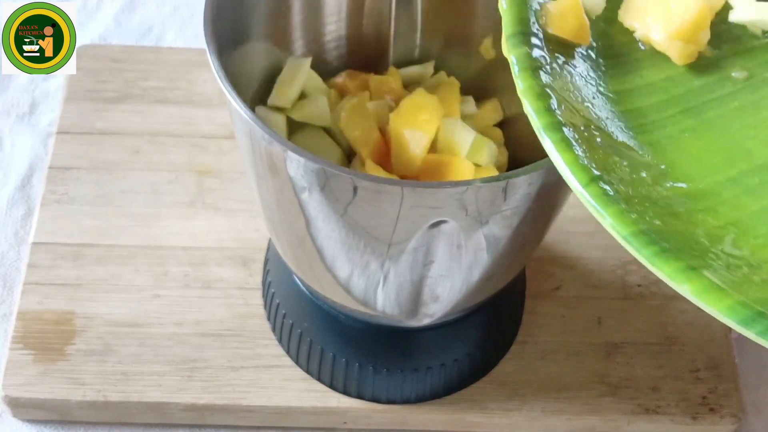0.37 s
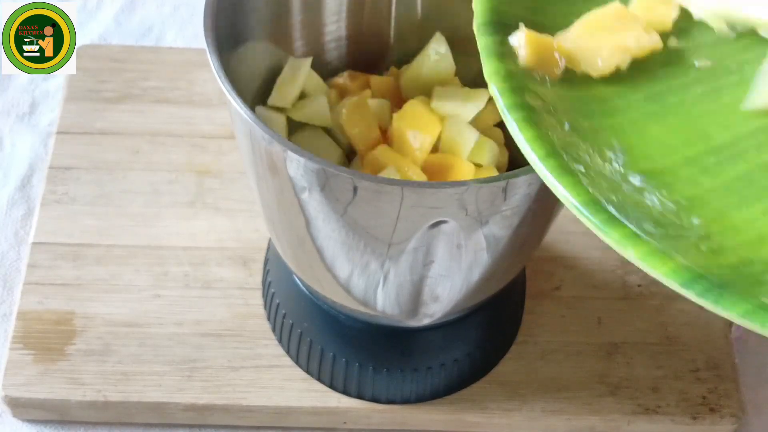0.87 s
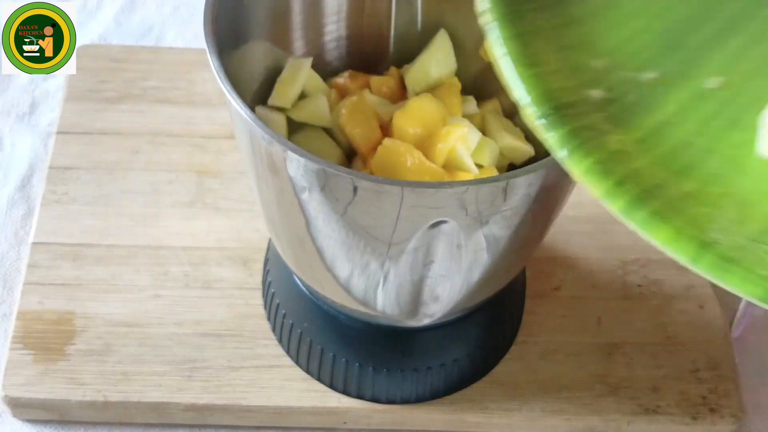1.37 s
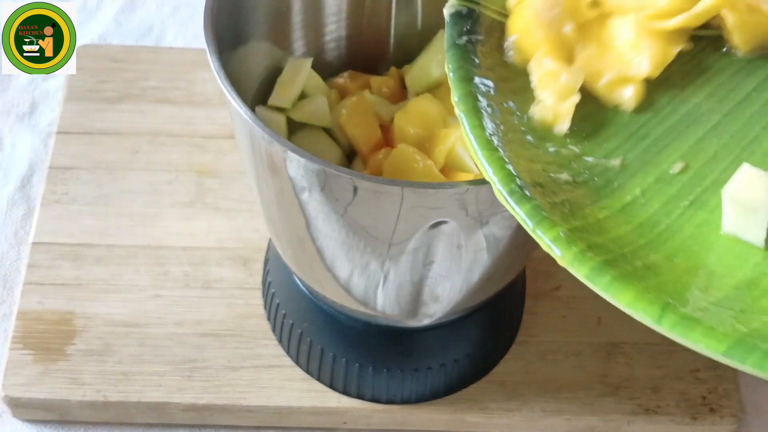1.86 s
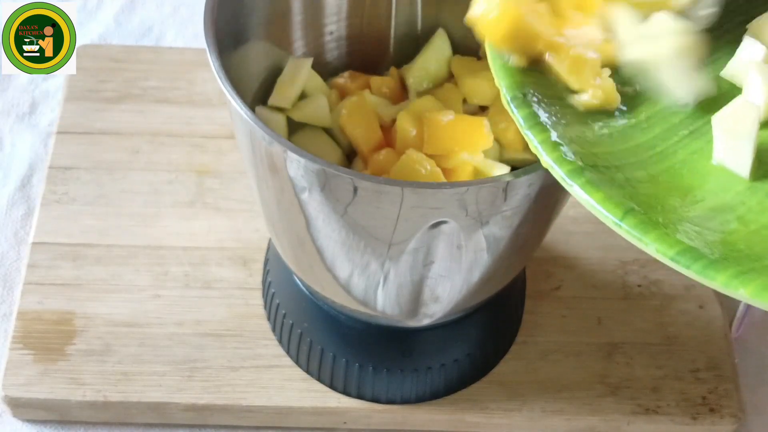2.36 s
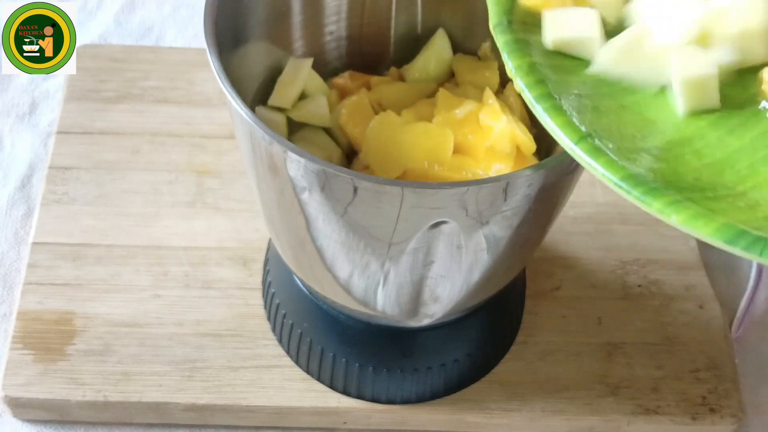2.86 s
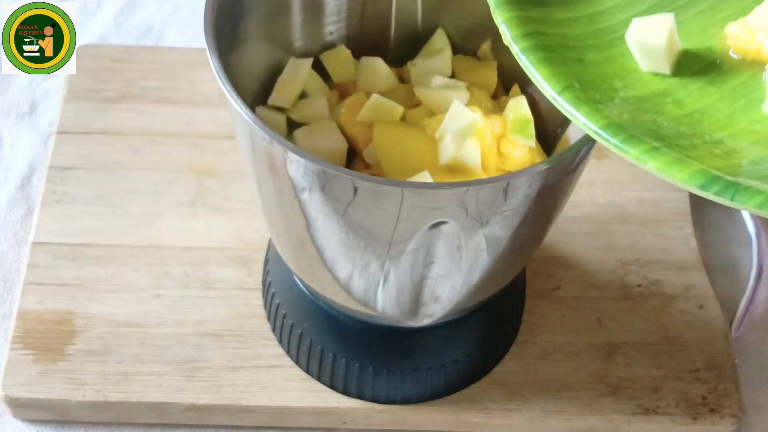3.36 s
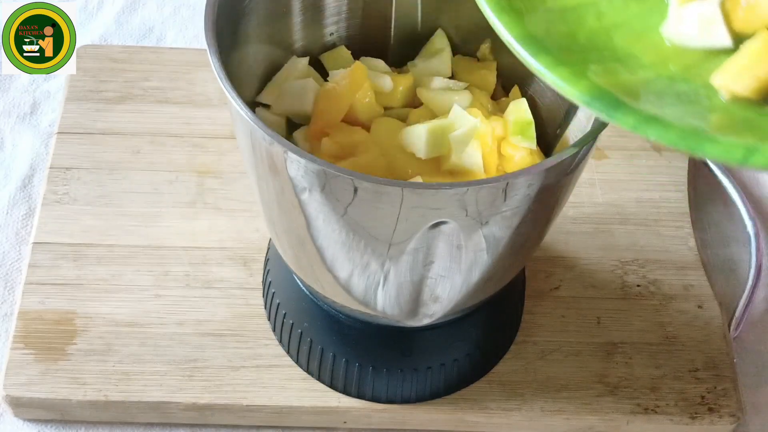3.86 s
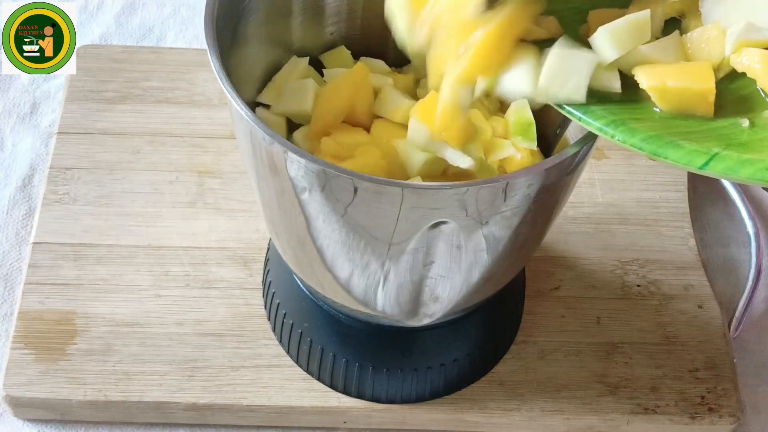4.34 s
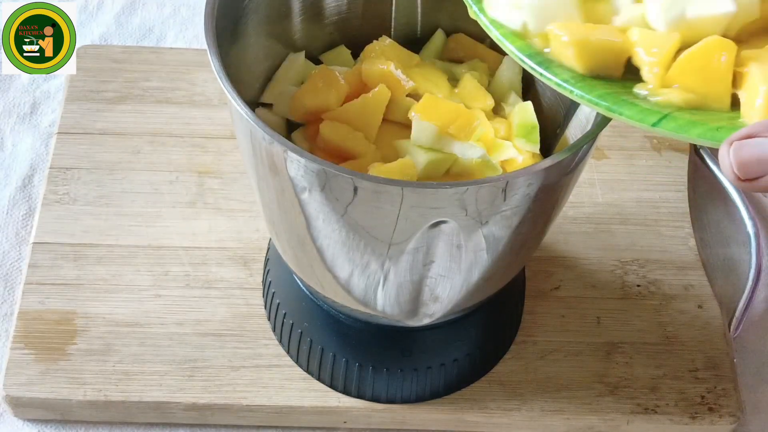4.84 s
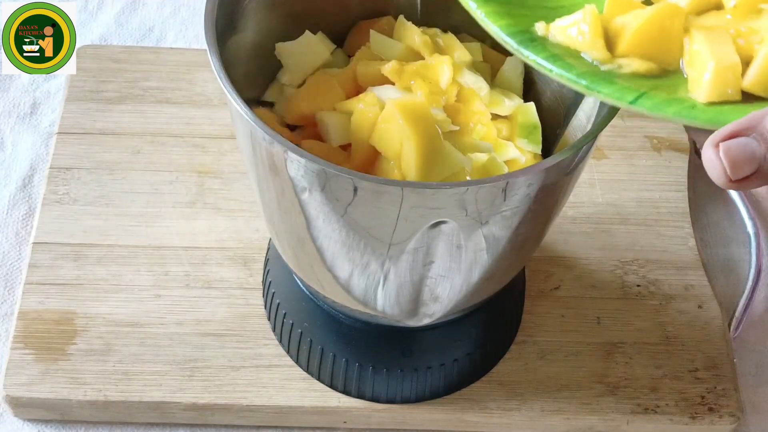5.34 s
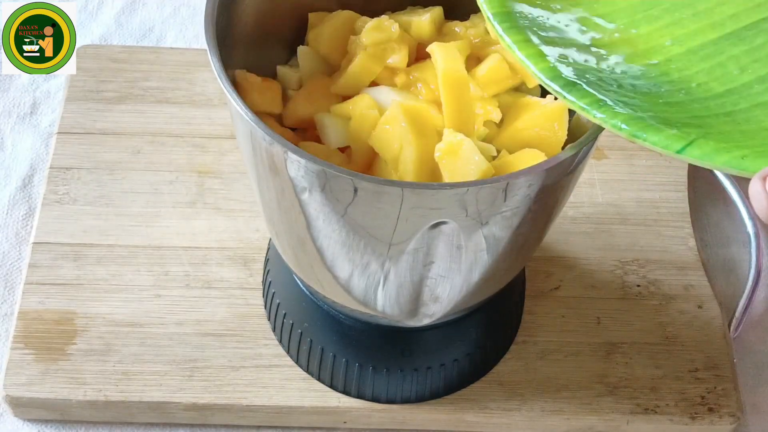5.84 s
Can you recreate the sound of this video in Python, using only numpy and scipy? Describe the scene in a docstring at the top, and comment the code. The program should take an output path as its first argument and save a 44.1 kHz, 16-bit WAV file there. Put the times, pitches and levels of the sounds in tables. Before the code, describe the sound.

Close to a phone in a small quiet kitchen, a steel spoon taps and scrapes chopped fruit off a hard plastic plate. Dry, sharp clacks come irregularly, each followed by a brief gritty slide, with soft hollow plops as pieces land in a steel jar. A short lull comes after the first second, then the work resumes, with the hardest knock past the middle and steady clacks to the end.

```python
"""A faint slide, then sharp taps: a steel spoon knocks and scrapes chopped fruit off a hard plastic plate. Each
tap excites decaying modes of plate and spoon; the sliding edge is gritty noise, partly rung through the same
modes. Fruit plops into a steel jar as decaying pairs of notes, a few with a sharp knock at the start, and some
taps carry a like low thump. A small kitchen echoes the blows, over a dull rumble of hands on plate and board
and a faint murmur of air, close to a phone."""
import sys
import numpy as np
from scipy import signal
from scipy.fft import rfft, irfft
from scipy.io import wavfile
from scipy.ndimage import uniform_filter1d

SR = 44100
rng = np.random.default_rng(int(sys.argv[2]) if len(sys.argv) > 2 else 0)


def ratio(d):
    """dB to gain"""
    e = np.asarray(d, float) / 20
    return 10 ** e


def log_audio(samples):
    """Write samples as a 16-bit WAV file to the path given in sys.argv[1]."""
    # one column per channel
    frames = np.atleast_2d(samples).T
    # limit to full scale, then quantise
    limited = np.clip(frames, -1, 1)
    pcm = np.round(limited * 32767).astype(np.int16)
    wavfile.write(sys.argv[1], SR, pcm)


N = 273861

# Spoon striking plate, with bounces; the rows at 2.348, 2.536 and 2.927 s give the sharp start of a fruit plop.
# # Each row: start in seconds, body level in dB before damping, # favoured mode in Hz, upper favoured mode in
# Hz, treble level in dB.
TAP_EVENTS = [(0.181, -13.5, 1290, 1580, -14.5), (0.184, -16, 757, 1570, -46),
              (0.199, -36, 860, 1600, -47.5), (0.41, -12, 1210, 1567, -17), (0.56, -11.5, 796, 2250, -35),
              (0.911, 0, 799, 2690, -13.5), (0.923, -25, 910, 1520, -43), (0.94, -10, 750, 1500, -46.5),
              (1.046, -10, 847, 1600, -16.5), (1.626, -31, 711, 1490, -56.5), (1.783, -30, 830, 1590, -48),
              (1.814, -16.5, 717, 1510, -33.5), (1.924, -22.5, 1110, 1540, -48),
              (1.975, -24.5, 710, 1520, -60), (2.209, -38.5, 990, 1590, -66),
              (2.247, -7.5, 650, 2020, -24.5), (2.255, -22, 600, 2330, -37), (2.265, -16.5, 700, 1540, -35),
              (2.348, -29, 604, 1580, -46), (2.481, -27, 702, 1510, -53), (2.536, -18, 700, 1540, -37),
              (2.839, -3, 590, 2760, -20), (2.879, -22, 704, 1630, -52), (2.927, -16, 710, 1520, -50),
              (3.003, -31, 1023, 2540, -42), (3.035, -28, 1120, 1500, -43.5),
              (3.339, -16.5, 1120, 2080, -30), (3.573, -28, 810, 3100, -38.5),
              (3.86, -5.5, 1103, 1957, -15.5), (4.111, -13, 705, 2810, -36.5), (4.602, 5, 870, 1770, -5),
              (4.619, -24, 910, 1740, -49.5), (4.701, -27, 829, 2180, -51), (4.714, -24, 1350, 1590, -58),
              (5.086, -16, 693, 1580, -28.5), (5.336, -7, 1122, 1770, -14.5), (5.351, -12, 813, 1710, -32),
              (5.571, -16.5, 1180, 1740, -49), (5.859, -6.5, 935, 1707, -16), (5.991, -12, 1242, 1500, -32)]
# Modes of the plate. Each row: frequency in Hz, relative level in dB, 60 dB decay time in seconds.
PLATE_MODES = [(301, -15, .06), (424, -10, 0.021), (507, -7, 0.022), (531, -3, 0.037), (716, -3, 0.04),
               (811.4, -2, 0.028), (898.3, -4.5, 0.062), (1120, -4, 0.034), (1228.5, -7.5, 0.054),
               (1512, -4, 0.033), (1600, -4, 0.03), (1707, -6, 0.02), (1999, -0.5, 0.026),
               (2342, -3.5, 0.046), (2537, 0, 0.024), (2760, -4.5, 0.023), (3013, -7, 0.052),
               (3300, -9, 0.023)]
# Modes of the spoon. Each row: frequency in Hz, relative level in dB, 60 dB decay time in seconds.
SPOON_MODES = [(4940, -17.5, 0.033), (5900, -18, 0.041), (7130, -14.5, 0.017), (9760, -7.5, 0.026),
               (10100, -7.5, .015), (10070, -6, 0.072), (10690, -6.5, 0.025), (11460, -6.5, 0.06),
               (13200, -16, .03), (14600, -20.5, .04)]
TOUCH_S = 0.0042  # time in which the edge meets the plate


def level(x):
    """Normalisation of power: scale to rms 1."""
    return x / np.sqrt(np.mean(x ** 2))


def colour(x, points):
    """Spectral shaping: gains in dB at given Hz, interpolated over log frequency."""
    hz, db = np.transpose(points)
    f = np.maximum(np.fft.rfftfreq(len(x), 1 / SR), 1)
    gain = ratio(np.interp(np.log(f), np.log(hz), db))
    return irfft(rfft(x) * gain, len(x))


def band(x, lo_hz, hi_hz):
    """Causal Butterworth band-pass."""
    edges = np.clip([lo_hz, hi_hz], 20, [SR / 2.2, SR / 2.1])
    return signal.sosfilt(signal.butter(2, edges, "bandpass", fs=SR, output="sos"), x)


def walk(rate):
    """Slow random modulation: levels drawn rate times a second, joined by ramps; spread near 1."""
    hold = int(SR / rate)
    steps = np.repeat(rng.standard_normal(N // hold + 1), hold)
    return 1.32 * uniform_filter1d(steps, hold)[:N]


def ring(hz, db, t60, t, phase):
    """Modal superposition: a sum of exponentially decaying sines, peak 1; phase in cycles."""
    swing = np.sin(2 * np.pi * (hz[:, None] * t + phase[:, None]))
    decay = 1000. ** (-t / t60[:, None])
    y = np.sum(ratio(db)[:, None] * swing * decay, axis=0)
    return y / np.abs(y).max()


def add(out, s, x):
    """Linear superposition: mix x in at s seconds."""
    i = int(s * SR)
    out[i:i + len(x)] += x[:N - i]


def taps():
    """Impact excitation: each blow lands elsewhere, so it favours other modes; a short crack starts it."""
    boom_db = -16.5  # low plate modes relative to the body of a tap
    out, t = np.zeros(N), np.arange(SR // 5) / SR
    plate_hz, plate_db, plate_t60 = np.transpose(PLATE_MODES)
    spoon_hz, spoon_db, spoon_t60 = np.transpose(SPOON_MODES)
    count = len(plate_hz)
    low = plate_hz < 640
    # the spoon stays on the plate and damps all but the first swings
    press = 0.18 + 0.74 * np.exp(-(t / 0.004) ** 2)
    onset = np.minimum(t / 0.00043, 1)
    for s, body_db, first_hz, second_hz, treble_db in TAP_EVENTS:
        spot = rng.standard_normal((2, count + len(spoon_hz)))
        favour_db = plate_db + 2 * spot[0, :count]
        favour_db += 15.0 * np.exp(-(np.log(plate_hz / first_hz) / 0.026) ** 2)
        favour_db += 11.0 * np.exp(-(np.log(plate_hz / second_hz) / 0.056) ** 2)
        phase = 0.5 + 0.1 * spot[1, :count]
        body = ring(plate_hz[~low], favour_db[~low], plate_t60[~low], t, phase[~low]) * press
        boom = ring(plate_hz[low], favour_db[low], plate_t60[low], t, phase[low])
        chime = ring(spoon_hz, spoon_db + 8.0 * spot[0, count:], spoon_t60, t, spot[1, count:])
        crack = rng.standard_normal(len(t)) * np.exp(-t / 0.0015)
        tick = band(crack, 6200, 12500) + 0.64 * band(crack, 2500, 16000)
        treble = 0.27 * chime + 1.1 * tick / np.abs(tick).max()
        blow = ratio(body_db) * body + ratio(body_db + boom_db) * boom + ratio(treble_db) * treble
        add(out, s, blow * onset)
    return out


def patchy(x, lo_hz, hi_hz, flicker_db, rate):
    """Independent band modulation: about quarter-octave bands flicker each on their own; rms 1."""
    edges = np.geomspace(lo_hz, hi_hz, int(4 * np.log2(hi_hz / lo_hz)) + 2)
    total = np.zeros(N)
    for k, (lo, hi) in enumerate(zip(edges, edges[1:])):
        total += (-1) ** k * band(x, lo, hi) * ratio(flicker_db * walk(rate))
    return level(total)


def slide(start, length, first_db, last_db, treble_db, modes, low, mid, upper, treble):
    """Sliding friction: touch, steady change of pressure, lift; it sets off from the spot of the last tap."""
    lift_db_per_s = -700
    rim_hz, to_rim_s = 1500, 0.14  # the favoured ring moves from the tap's to the rim's
    t = np.arange(len(mid)) / SR - TOUCH_S
    db = first_db + (last_db - first_db) * np.clip(t / length, 0, 1)
    treble_db = treble_db + 0.09 * (db - first_db)  # a fading slide also dulls
    touch = np.clip(1 + t / TOUCH_S, 0, 1)
    lift = ratio(lift_db_per_s * np.maximum(t - length, 0))

    earlier = [tap for tap in TAP_EVENTS if tap[0] <= start]
    spot_hz = earlier[-1][2] if earlier else rim_hz
    since = t + start - (earlier[-1][0] if earlier else 0)
    near_hz = rim_hz + (spot_hz - rim_hz) * np.exp(-np.maximum(since, 0) / to_rim_s)
    # the place of the edge decides which modes answer best
    plate_hz = np.array(PLATE_MODES)[:, :1]
    weight = 0.4 + np.exp(-(np.log(plate_hz / near_hz) / 0.23) ** 2)
    tone = np.sum(weight * modes, axis=0) / np.sqrt(np.sum(weight ** 2, axis=0))

    body = np.sqrt(0.5) * (mid + tone)  # equal power of hiss and plate ring
    # lows take a larger share in faint and in dull slides; upper mids follow the treble
    low_db = -25.5 - 0.3 * db - 0.3 * treble_db
    upper_db = -7 + 0.86 * treble_db
    hiss = ratio(low_db) * low + ratio(upper_db) * upper + ratio(treble_db) * treble
    return touch * lift * ratio(db) * (body + hiss)


def scrape():
    """Stick-slip friction: the edge catches on the ribbed plate; gritty noise partly excites its modes."""
    # Colour of the friction noise. Each row: frequency in Hz, relative density in dB.
    hiss_points = [(59, -44.5), (100, -18), (230, -16), (331, -4.5), (642, -1.5), (884, -4.5), (1240, -9),
                   (1410, -7), (1750, -5), (6870, -22), (9070, -7.5), (15100, -29.5), (16500, -57.5)]
    # Slides of the spoon and faint shifts of the plate. Each row: start in seconds, length in seconds,
    # first level in dB, last level in dB, treble at the start in dB relative to the slide.
    slide_rows = [(0.0, 0.16, -66.5, -66.5, -16), (.19, 0.061, -34.5, -49.5, -1.5),
                  (0.301, 0.058, -68, -69, -20), (0.416, 0.14, -34.5, -50.5, -9.5),
                  (0.575, 0.066, -54, -68, -4), (0.654, 0.068, -61, -38, -11.5),
                  (0.775, 0.029, -58, -54, -24), (0.923, 0.1, -28, -42, -8.5),
                  (1.056, .02, -33.5, -39.5, -0.5), (1.111, 0.089, -60.5, -75, -26.5),
                  (1.622, 0.059, -49, -49, -0.5), (1.78, 0.026, -53.5, -49, -7.5),
                  (1.821, 0.05, -47, -54, -12), (1.865, 0.065, -60, -49, -12.5),
                  (1.933, 0.043, -47.5, -49.5, -13.5), (1.988, 0.12, -50.5, -69, -19),
                  (2.112, 0.12, -67.5, -62.5, -20.5), (2.255, 0.089, -31.5, -44, -11),
                  (2.356, 0.066, -42, -47.5, -11.5), (2.482, 0.021, -51.5, -43.5, -16),
                  (2.514, 0.019, -50, -35, -13), (2.563, 0.087, -57, -75, -9),
                  (2.808, 0.024, -68, -59, -20.5), (2.851, 0.053, -39.5, -42, -7),
                  (2.913, 0.029, -49, -41.5, -15), (2.95, 0.092, -45, -56, -7.5),
                  (3.039, 0.052, -48, -37, -12), (3.161, 0.18, -74.5, -70.5, -19),
                  (3.346, 0.037, -39, -41, -7), (3.384, 0.049, -38, -40, -2),
                  (3.439, .075, -43.5, -44, -4.5), (3.519, 0.053, -61, -65, -14),
                  (3.583, 0.042, -51, -54, 3.5), (3.615, 0.056, -61, -41, -13),
                  (3.709, 0.18, -58.5, -65, -19), (3.87, 0.12, -37.5, -39, -9.5),
                  (4, 0.088, -38.5, -47.5, -9), (4.115, 0.062, -36, -58.5, -21),
                  (4.297, 0.052, -74.5, -73, -19.5), (4.36, 0.07, -70, -56.5, -19),
                  (4.439, 0.15, -64, -58.5, -24.5), (4.615, 0.092, -30.5, -39, -9.5),
                  (4.713, .17, -41, -45, -10), (4.889, 0.057, -46.5, -51, -15),
                  (5.091, 0.082, -39.5, -53.5, -17.5), (5.208, 0.11, -64, -58, -25),
                  (5.347, 0.049, -27, -38.5, -10.5), (5.407, 0.16, -41.5, -46, -11),
                  (5.571, 0.037, -40, -46, -10), (5.618, 0.069, -50, -42.5, -14.5),
                  (5.721, 0.1, -67, -66.5, -11.5), (5.866, 0.091, -30, -40, -9.5),
                  (5.967, 0.031, -51, -23, -16), (6.056, .03, -67.5, -76, -24)]
    slip = ratio(1.8 * walk(220))
    unsteady = np.array([ratio(1.3 * walk(60)) for _ in range(4)])
    grit = rng.standard_normal((4, N)) * slip * unsteady
    # wet catches of the edge: about 500 ticks a second of very unequal size, heard most in the treble
    sizes = ratio(2.5 * rng.exponential(size=N)) * rng.standard_normal(N)
    ticks = (rng.random(N) < 500 / SR) * sizes
    grit = grit + np.array([[0], [1.5], [3.0], [3.0]]) * ticks
    edges_hz = [110, 600, 3700, 7200, 17000]
    low, mid, upper, treble = [patchy(colour(g, hiss_points), lo, hi, flicker_db=4.0, rate=35)
                               for g, lo, hi in zip(grit, edges_hz, edges_hz[1:])]
    # a sliding edge damps the plate less than a resting spoon: narrow modes that come and go
    modes = []
    for hz, db, t60 in PLATE_MODES:
        tone = level(band(grit[0], hz - 0.65 / t60, hz + 0.78 / t60))
        modes.append(ratio(db + 4.0 * walk(26)) * tone)
    modes = level(np.array(modes))
    for hz, db, t60 in SPOON_MODES:
        tone = level(band(grit[0], hz - 0.84 / t60, hz + 1.5 / t60))
        treble = treble + ratio(db - 12.5 + 3.0 * walk(10)) * tone
    treble, out = level(treble), np.zeros(N)
    for row in slide_rows:
        i = max(int((row[0] - TOUCH_S) * SR), 0)
        part = slice(i, i + int(row[1] * SR) + SR // 8)  # leaves room for the lift
        out[part] += slide(*row, modes[:, part], low[part], mid[part], upper[part], treble[part])
    return out


def low_thumps():
    """Low thumps: fruit plopping into the jar and the low body under some taps push slowly and unevenly; a note
    with an upper partner."""
    # Fruit landing in the jar, and low thumps beneath some taps. Each row: start in seconds, level in dB, #
    # pitch in Hz, upper note in dB relative to the lower (held to 0 at most), 60 dB decay time in seconds.
    thumps = [(0.418, -30.5, 402, -14, 0.079), (0.773, -34.5, 558, -9, 0.12),
              (0.799, -36.5, 580, -7, 0.082), (0.914, -21.5, 404, -2, 0.086), (0.942, -24, 410, 5, 0.072),
              (1.82, -33.5, 307, -6, 0.09), (2.25, -28.5, 435, -15, 0.071), (2.347, -21, 526, -20, 0.038),
              (2.555, -26, 428, -11, 0.054), (2.804, -39.5, 477, -10, 0.073),
              (2.84, -15.5, 503, -19, 0.055), (2.86, -25.5, 588, -16, 0.064),
              (2.924, -31.5, 705, -15, 0.069), (2.939, -28, 567, -16.5, 0.06),
              (3.439, -35, 520, -15, 0.067), (3.862, -31, 260, -2, 0.036),
              (3.904, -24.5, 216, -12, 0.093), (4.024, -25.5, 252.4, -16, .07),
              (4.373, -34, 120, -15, 0.093), (4.4, -31.5, 115, -12.5, 0.083),
              (4.424, -35, 203.3, -27, 0.077), (4.604, -22, 200, -10, 0.034),
              (4.762, -38.5, 481, -12, .1), (4.8, -39, 388, -16, 0.09), (4.86, -41.5, 338, -21, 0.058),
              (5.345, -21, 330.5, -11, 0.077), (5.45, -35.5, 330, -25, 0.075),
              (5.573, -35, 303, -20, 0.099), (5.688, -36, 112, -10, 0.089),
              (5.76, -46.5, 285, -14.5, 0.11), (5.861, -23, 325, -4.5, 0.053),
              (5.964, -34.5, 720, -19, .06), (5.987, -36, 300, -12, 0.072)]
    push_cycles, squash_depth = 0.35, 0.38  # push in cycles of the note; rms unevenness of the wet contact
    out, t = np.zeros(N), np.arange(SR // 4) / SR
    for s, db, hz, upper_db, t60 in thumps:
        squash = 1 + squash_depth * level(band(rng.standard_normal(len(t)), 25, hz / 3))
        upper_note = ratio(min(upper_db, 0)) * np.sin(2 * np.pi * 1.8 * hz * t)
        note = np.sin(2 * np.pi * hz * t) + upper_note
        decay = 1000. ** (-t / max(t60, 0.01))
        push = 1 - np.exp(-t * hz / push_cycles)
        add(out, s, -ratio(db) * note * squash * decay * push)
    return out


def room(x):
    """Reverberation by convolution: the dense short echo of hard kitchen walls."""
    t60_s = 0.23
    t = np.arange(SR // 2) / SR
    noise = band(rng.standard_normal(len(t)), 250, 12000)
    tail = noise * 1000. ** (-t / t60_s) * np.clip(t / 0.002, 0, 1)
    return signal.fftconvolve(x, tail / np.sqrt(np.sum(tail ** 2)))[:N]


def rumble():
    """Structure-borne sound: dull, throbbing noise from the grip, carried through the board."""
    # Hands on plate and board. Each row: time in seconds, level in dB (1 dB is taken off below).
    grip_levels = [(0.0, -76), (0.64, -72), (0.97, -72.5), (1.19, -89), (1.6, -78.5), (1.92, -63),
                   (2.42, -70), (2.631, -79.5), (2.85, -78), (3.01, -65.5), (3.51, -65.5), (4.01, -71.5),
                   (4.151, -80.5), (4.41, -79.5), (4.551, -55), (4.91, -69), (5.14, -73.5), (5.479, -64),
                   (5.861, -67.5), (6.05, -82), (6.21, -81.5)]
    s, db = np.transpose(grip_levels)
    upper_thud = level(band(rng.standard_normal(N), 82, 180))
    deep_thud = level(band(rng.standard_normal(N), 30, 70))
    throb_db = np.interp(np.arange(N) / SR, s, db) - 1.0 + 4.2 * walk(27)
    return (upper_thud + ratio(-6.5) * deep_thud) * ratio(throb_db)


def air():
    """Broadband noise: a faint room murmur whose bands waver on their own, and a thin high hiss."""
    # Colour of the murmur. Each row: frequency in Hz, relative density in dB.
    murmur_points = [(15, -49), (25, -29.5), (54, -4.5), (157, 1), (595, -13.5), (680, -9), (1890, -21.5),
                     (2750, -23.5), (3070, -19), (3350, -33.5), (5000, -39.5), (6500, -72.5), (11000, -120)]
    murmur_db, hiss_db = -68.5, -89.5
    edges_hz = [25, 150, 500, 1300, 3500, 7000]
    murmur = np.zeros(N)
    for lo, hi in zip(edges_hz, edges_hz[1:]):
        noise = colour(rng.standard_normal(N), murmur_points)
        murmur += band(noise, lo, hi) * ratio(1.2 * walk(9))
    hiss = band(rng.standard_normal(N), 10000, 10400) + 0.26 * band(rng.standard_normal(N), 4000, 15000)
    return level(murmur) * ratio(murmur_db) + level(hiss) * ratio(hiss_db)


def scene():
    """Superposition of sources: the phone's port sheds the deep bass of near sounds; rumble and air join."""
    room_db = -14.5
    blows = band(taps(), 260, 19000) + low_thumps()
    near = blows + ratio(room_db) * room(blows) + scrape()
    return (band(near, 59, 13000) + rumble() + air())[None]


def roll_off(x):
    """The treble ends steeply here."""
    return signal.sosfilt(signal.butter(12, 16900, fs=SR, output="sos"), x)


def record(dry):
    """Saturation and low-pass filtering: the phone rounds the loudest peaks and cuts the top."""
    top_hz = 16800
    rounded = 0.9 * np.tanh(dry / 0.9)
    low_pass = signal.ellip(8, 0.2, 70, top_hz, fs=SR, output="sos")
    mix = signal.sosfilt(low_pass, rounded)
    return roll_off(mix)


dry = scene()
out = record(dry)
log_audio(out)
```